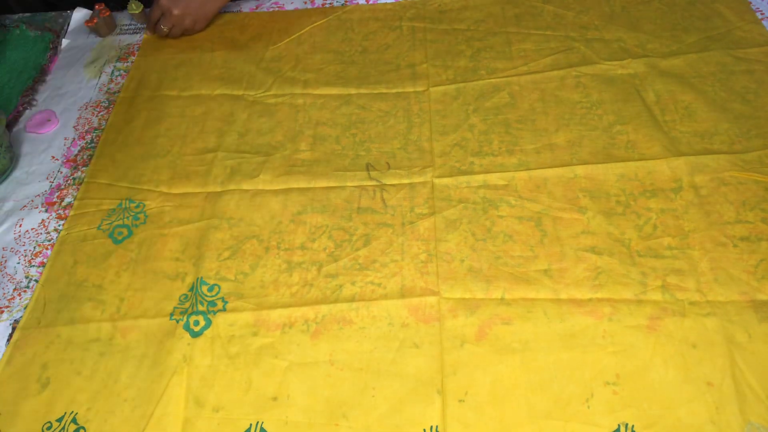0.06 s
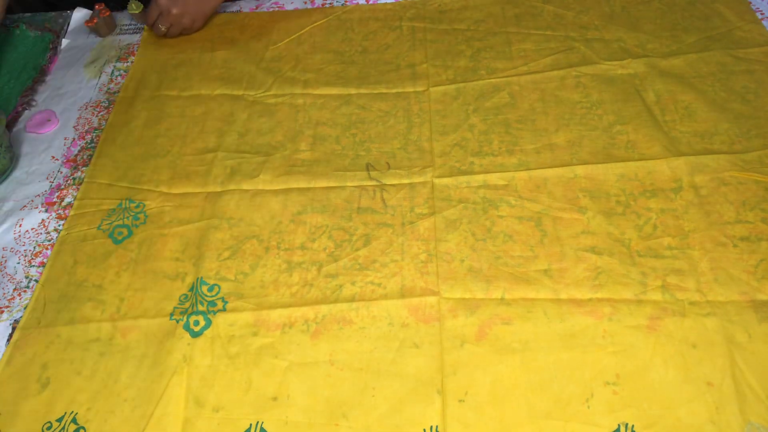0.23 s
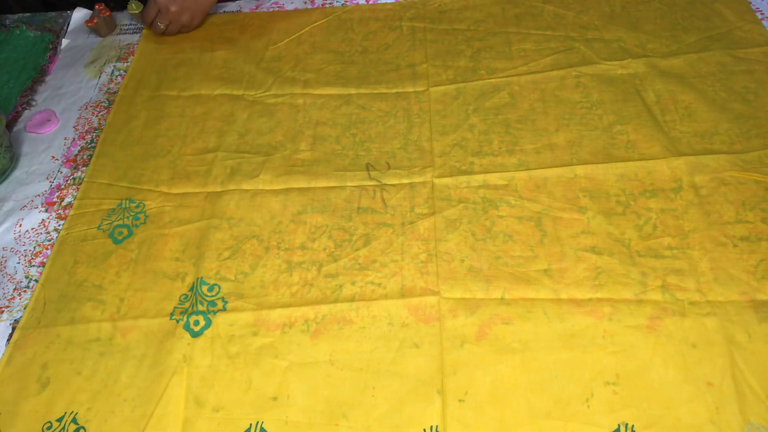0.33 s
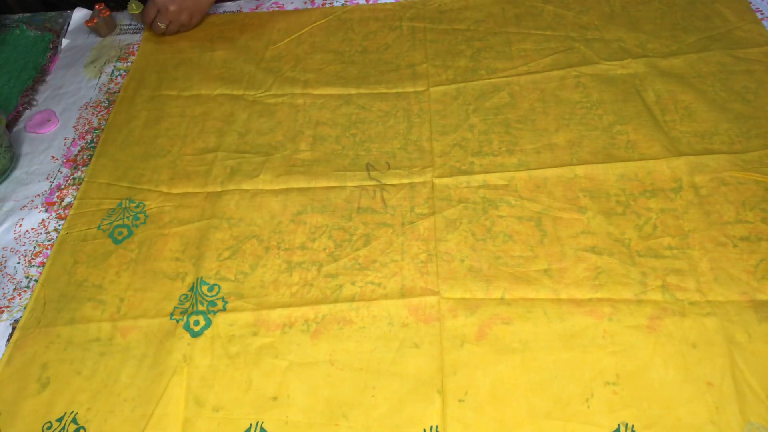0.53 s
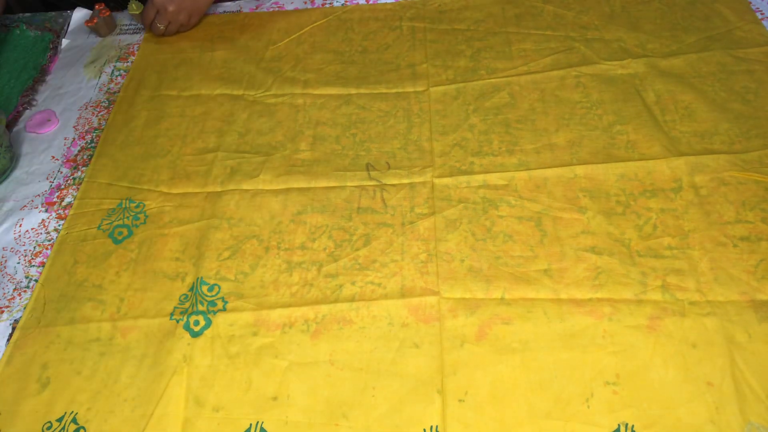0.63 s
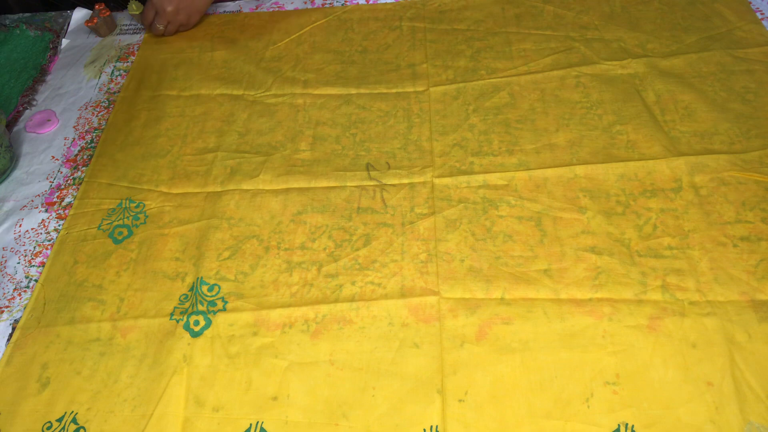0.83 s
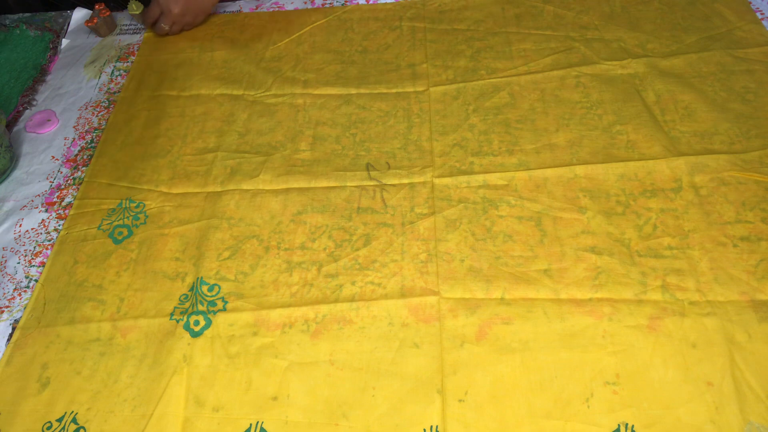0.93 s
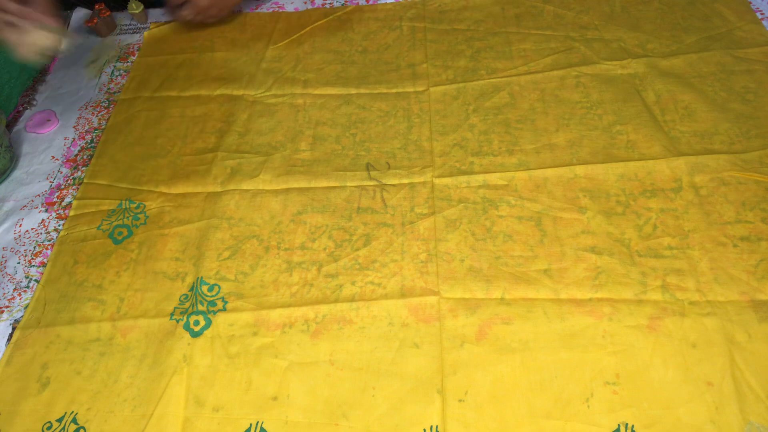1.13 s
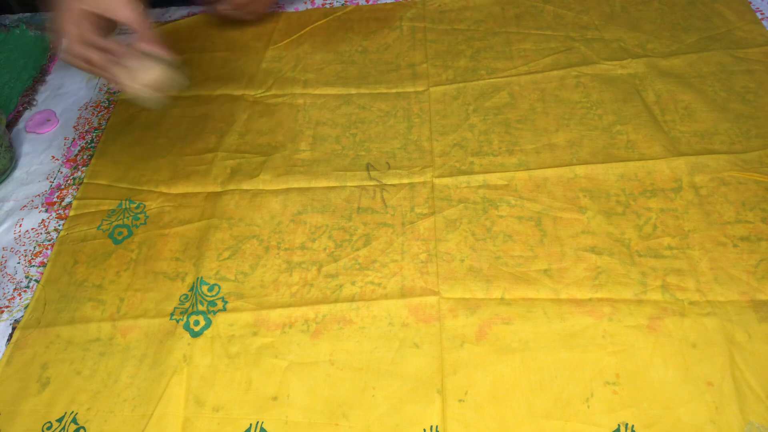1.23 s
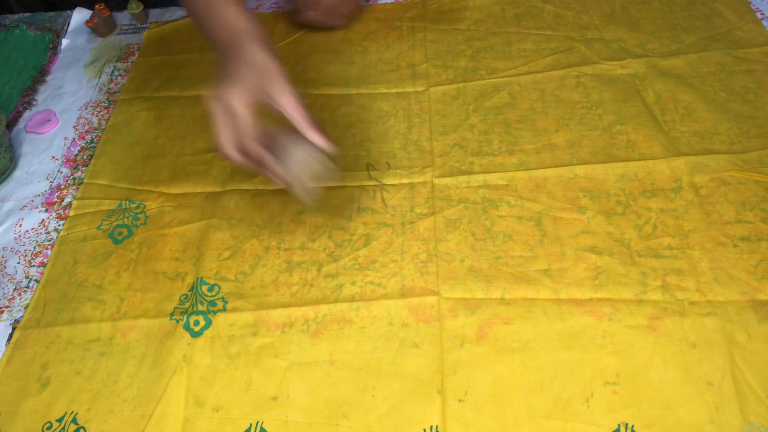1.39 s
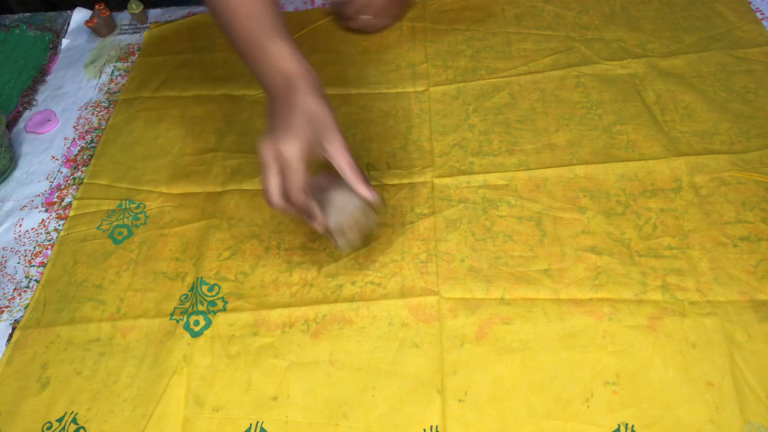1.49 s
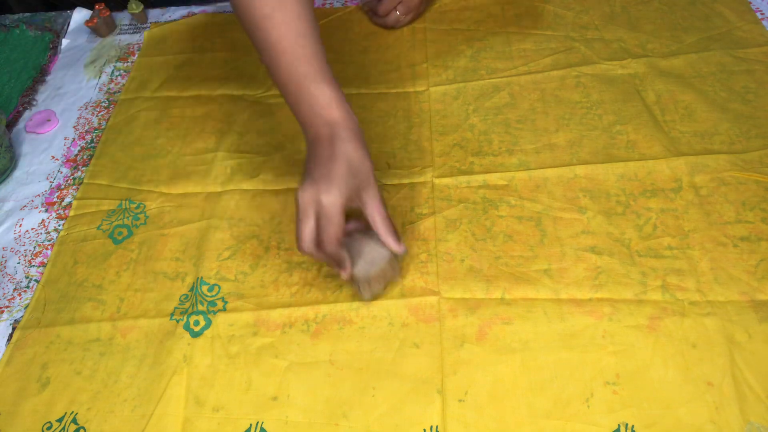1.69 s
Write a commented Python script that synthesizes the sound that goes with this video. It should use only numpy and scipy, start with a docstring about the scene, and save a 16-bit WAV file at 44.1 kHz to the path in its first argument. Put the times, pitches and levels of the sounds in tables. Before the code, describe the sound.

A wooden printing block thumps three times on a wet ink pad, with small ticks.

```python
"""Over faint room tone, a light clack, a thud and a wet squish: a wooden printing block on a cloth ink pad.
It is dabbed three times, close to one microphone in a small, quiet room. An edge lands and rings the
block, the face thuds the tray and presses out ink, then small sharp ticks follow as the block peels off.
The hand shifts its grip and carries the block over the cloth with a faint rustle; meanwhile a short,
round click sounds somewhere in the room."""
import sys
import numpy as np
from scipy import signal
from scipy.fft import rfft, irfft
from scipy.io import wavfile

SR = 44100
rng = np.random.default_rng(int(sys.argv[2]) if len(sys.argv) > 2 else 0)


def store_pcm(level_fs):
    """Save levels as 16-bit WAV."""
    pcm = np.round(np.clip(level_fs, -1, 1) * 32767).astype(np.int16)
    wavfile.write(sys.argv[1], SR, np.atleast_2d(pcm).T)


N = 77175


def undb(db):
    """Decibels to gain."""
    return 10 ** (np.asarray(db) / 20)


def since(start):
    """Seconds elapsed since start, zero before it."""
    return np.maximum(np.arange(N) / SR - start, 0)


def over_hz(points, hz):
    """Read a table on a log-frequency axis."""
    freqs, values = np.array(points, float).T
    return np.interp(np.log(hz + 1e-9), np.log(freqs), values)


def colour(noise, spectrum):
    """Give a noise a spectrum; rms 1."""
    gain = undb(over_hz(spectrum, np.fft.rfftfreq(N, 1 / SR)))
    shaped = irfft(rfft(noise) * gain, N)
    return shaped / shaped.std()


def grains(spread_db, size=24):
    """Noise made of brief grains of uneven strength."""
    noise = rng.standard_normal(N)
    grain_db = spread_db * np.clip(rng.standard_normal(N // size + 1), -2, 2)
    return noise * np.repeat(undb(grain_db), size)[:N]


def burst(start, rise, decay):
    """Straight rise, exponential fall."""
    t = since(start)
    return np.minimum(t / rise, 1) * np.exp(-np.maximum(t - rise, 0) / decay)


def ring(modes, start, longest_t60_s=.14):
    """Modes of a struck body; neighbours swing opposite ways, and the cloth cuts long rings short."""
    t, out = since(start), 0
    for k, (hz, db, t60) in enumerate(modes):
        fade = np.exp(-np.log(1000) * t / min(t60, longest_t60_s))
        out += (-1) ** k * undb(db) * np.sin(2 * np.pi * hz * t) * fade
    return out


def cushion(blow, contact_ms):
    """Spread a blow over a soft contact: the longer, the duller."""
    age = np.arange(512) / SR * 1000 / contact_ms
    push = age * np.exp(-age)
    return signal.fftconvolve(blow, push / push.sum())[:N]


# spectrum of the still room at the microphone: f/Hz, level/dB
AIR_SPECTRUM = [(25, -7), (55, 5), (110, -3), (180, 0), (420, -8.5), (1000, -15.5), (1800, -19.5),
                (3700, -21), (4900, -23.5), (7300, -25), (10400, -31.5), (15000, -25)]

def room_tone(air_db=-63, whine_db=-76.5, whine_hz=15585):
    """Room rumble, hiss and a thin electrical whine."""
    air = colour(rng.standard_normal(N), AIR_SPECTRUM)
    whine = np.sin(2 * np.pi * whine_hz * since(0))
    return undb(air_db) * air + undb(whine_db) * whine


# the face lands on the pad: t/s, thud level/dB, contact/ms, squish level/dB
FACE_LANDINGS = [(.2050, -6.5, 0.37, -39), (0.4343, -1.5, 0.2, -35.5), (.6161, -3.5, 0.33, -40.5)]
# modes of the tray and the table under it: f/Hz, level/dB, t60/s before the cloth damps them
TRAY_MODES = [(63, -39, 0.037), (151, -17.5, .08), (216.3, -23.5, 0.18), (278.4, -20.5, 0.039),
              (325.8, -18.5, 0.1), (377, -25, 0.21), (426, -8, 0.023), (540, -18, 0.026), (586, -29, 0.2),
              (704.5, -19, .045), (927, -31, 0.083), (1124, -31.5, 0.065)]
# spectrum of the wet pad from close by: f/Hz, level/dB
SQUISH_SPECTRUM = [(200, -12), (700, 24), (1300, 12.5), (2000, 3.5), (3700, 4.5), (4900, -4), (6500, -0.5),
                   (10000, -13.5), (14500, -3), (16000, -31)]

def dabs(rise_s=.005, decay_s=.013):
    """The wet pad squishes, peaking as the block's face thuds into the tray."""
    wet, out = colour(grains(spread_db=3.5), SQUISH_SPECTRUM), 0
    for start, thud_db, contact_ms, squish_db in FACE_LANDINGS:
        out += undb(thud_db) * cushion(ring(TRAY_MODES, start), contact_ms)
        out += undb(squish_db) * wet * burst(start - rise_s, rise_s, decay_s)
    return out


# ink spurts from under the block: t/s, level/dB, decay/s
INK_SPURTS = [(0.2019, -44.5, 0.0013), (0.2215, -45, 0.011), (0.429, -39.5, 0.0015), (0.433, -32, 0.0011),
              (.6180, -53.5, 0.0045)]
# spectrum of their fizz: f/Hz, level/dB
SPURT_SPECTRUM = [(500, -12), (3000, -3), (7000, -1), (10000, -6), (12500, -2), (14500, 3), (16000, -3)]

def spurts(rise_s=.0006):
    """Bright fizz of ink and air pressed out of the pad."""
    envelope = sum(undb(db) * burst(start, rise_s, decay) for start, db, decay in INK_SPURTS)
    return colour(grains(spread_db=9), SPURT_SPECTRUM) * envelope


# knocks on the block, at the pad: t/s, level/dB, contact/ms
BLOCK_KNOCKS = [(0.2025, -26.5, 0.081), (0.3377, -53.5, 0.031), (0.4271, -24.5, 0.086),
                (0.6079, -39, 0.043), (0.759, -54.5, 0.01)]
# modes of the block: f/Hz, level/dB, t60/s
BLOCK_MODES = [(525.5, -7, 0.05), (943, 1.5, 0.02), (1140, 3.5, 0.01), (1260, -8.5, 0.052),
               (1530, -46, 0.091), (1740, -5.5, 0.017), (2590, -3.5, 0.0067), (3767, -7.5, 0.018)]

def clacks():
    """The wooden block rings as an edge lands, it comes free or the grip shifts."""
    return sum(undb(db) * cushion(ring(BLOCK_MODES, start), contact_ms)
               for start, db, contact_ms in BLOCK_KNOCKS)


# the block peels off or shifts in the fingers: peak t/s, rise/s, decay/s, level/dB
PEEL_SWELLS = [(0.34, 0.033, 0.019, -53.5), (0.539, 0.046, .03, -58), (0.73, 0.04, 0.03, -68.5),
               (0.77, 0.022, .03, -55.5), (1.068, 0.049, 0.031, -55.5), (1.237, 0.0053, 0.025, -56),
               (1.748, 0.025, .02, -52.5)]
# spectrum of the crackle: f/Hz, level/dB
PEEL_SPECTRUM = [(150, 6), (600, -2.5), (1100, -2), (2500, -0.5), (3800, -2), (4900, -6), (6500, -7),
                 (10000, -21), (14500, -14), (16000, -12.5)]

def peels():
    """Fine crackle that builds as the block lets go, then dies away."""
    envelope = sum(undb(db) * burst(peak - rise, rise, decay) for peak, rise, decay, db in PEEL_SWELLS)
    return colour(grains(spread_db=3), PEEL_SPECTRUM) * envelope


# ticks, some followed about 15 ms later by a fainter echo: t/s, level/dB, centre f/Hz
SHARP_TICKS = [(.3080, -45, 2200), (.3272, -45, 3600), (.3357, -36, 3000), (.5243, -36, 2300),
               (.5390, -46, 2200), (.6135, -41, 2900), (.7300, -42, 3400), (.7605, -37, 2500),
               (.7770, -48, 3500), (1.6995, -57, 2500)]

def ticks(rise_s=.0002, decay_s=.0008):
    """Small sharp ticks, each a burst of noise with a broad resonance."""
    out = 0
    for start, db, hz in SHARP_TICKS:
        hump = [(hz / 5, -22), (hz / 3.5, -2), (hz, 0), (hz * 1.3, -5), (hz * 3, -17), (hz * 6, -28)]
        noise = colour(rng.standard_normal(N), hump)
        out += undb(db) * noise * burst(start, rise_s, decay_s)
    return out


# cloth slides, faint even this close: t/s, rise/s, hold/s, release/s, level/dB
CLOTH_SLIDES = [(0.893, 0.1, 0.0092, 0.034, -61), (1.419, 0.0083, 0.13, .11, -60)]
# spectrum of rubbing cloth: f/Hz, level/dB
CLOTH_SPECTRUM = [(150, -8), (600, 2), (1700, 5), (4500, -1), (6500, 5), (10500, -5), (14000, 2.5),
                  (16000, 0.5)]

def slides():
    """Soft hiss of cloth as the arm moves."""
    swell = sum(undb(db) * np.interp(since(start), np.cumsum([0, rise, hold, release]), [0, 1, 1, 0])
                for start, rise, hold, release, db in CLOTH_SLIDES)
    return colour(grains(spread_db=2.5), CLOTH_SPECTRUM) * swell


# a click somewhere in the room, then its echo: t/s, level/dB, f/Hz
ROOM_CLICK = [(1.0453, -39, 1650), (1.0618, -49, 1850)]

def room_click(rise_s=.0003):
    """A short, round click and its echo: each a few soft-edged cycles of a heavily damped resonance."""
    out = 0
    for start, db, hz in ROOM_CLICK:
        t = since(start)
        envelope = 2 * (t / rise_s) ** 2 * np.exp(-t / rise_s)
        out += undb(db) * envelope * np.sin(2 * np.pi * hz * t)
    return out


# echoes off floor and walls, by paths 4 to 14 m longer than the direct one: delay t/s, level/dB
WALL_ECHOES = [(.01306, -9), (.02102, -12), (.0303, -14), (.04155, -17)]

def near_walls(sound):
    """The sound reaches the microphone, followed by its first distinct reflections."""
    return sound + sum(undb(db) * np.pad(sound, (int(delay * SR), 0))[:N] for delay, db in WALL_ECHOES)


# decay of the small room: f/Hz, t60/s
TAIL_T60 = [(100, 0.56), (400, 0.5), (1500, 0.33), (6000, 0.95), (15000, 0.9)]
# its echoes at the microphone, relative to the direct sound: f/Hz, level/dB
TAIL_LEVEL = [(60, -13), (150, -16), (400, -15.5), (1000, -16.5), (3000, -13), (15000, -13)]

def room(sound, gap_s, build_s):
    """Diffuse echoes in octave bands; the treble lasts longest."""
    freqs, t, tail = np.fft.rfftfreq(N, 1 / SR), since(gap_s), 0
    noise = rfft(rng.standard_normal(N))
    for hz in 62.5 * 2 ** np.arange(9):
        band = (freqs >= hz / np.sqrt(2)) & (freqs < hz * np.sqrt(2))
        fade = np.minimum(t / build_s, 1) * np.exp(-np.log(1000) * t / over_hz(TAIL_T60, hz))
        gain = undb(over_hz(TAIL_LEVEL, hz)) / np.linalg.norm(fade)
        tail += gain * irfft(noise * band, N) * fade
    return signal.fftconvolve(sound, tail)[:N]


def scene():
    """Block, pad and cloth close to one microphone, with the room behind them."""
    early = near_walls(dabs()) + spurts() + clacks() + peels() + ticks() + slides() + room_click()
    return (early + room(early, gap_s=.0017, build_s=.0063) + room_tone())[None]


def record(dry, low_cut_hz=45, top_hz=15750):
    """The recorder thins the deep bass and cuts the top."""
    low_cut = signal.butter(2, low_cut_hz, "high", fs=SR, output="sos")
    top_cut = signal.ellip(10, .2, 70, top_hz, fs=SR, output="sos")
    return signal.sosfilt(top_cut, signal.sosfilt(low_cut, dry))


dry = scene()
out = record(dry)
store_pcm(out)
```